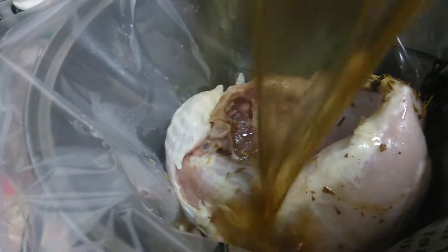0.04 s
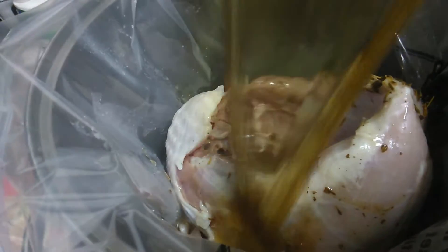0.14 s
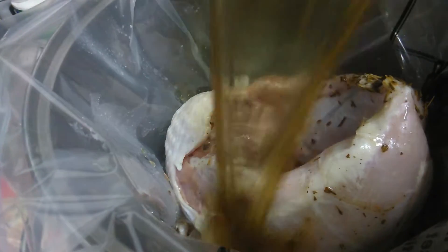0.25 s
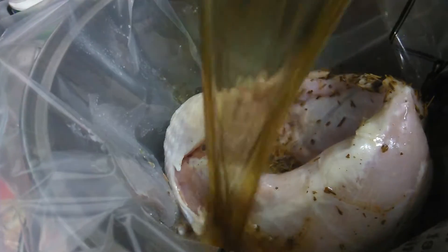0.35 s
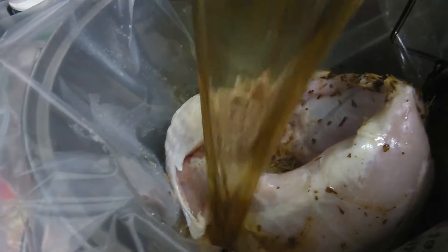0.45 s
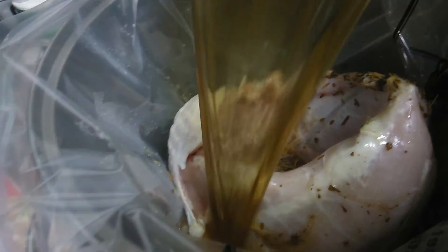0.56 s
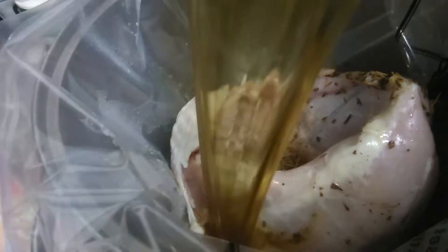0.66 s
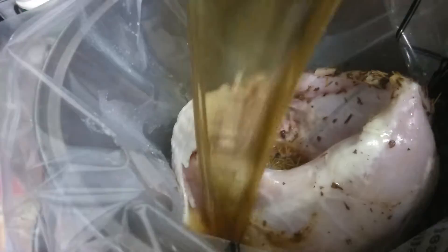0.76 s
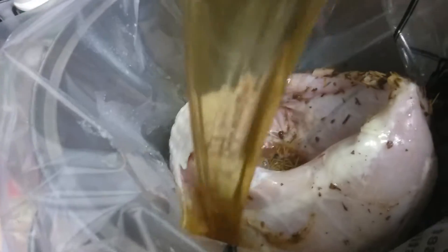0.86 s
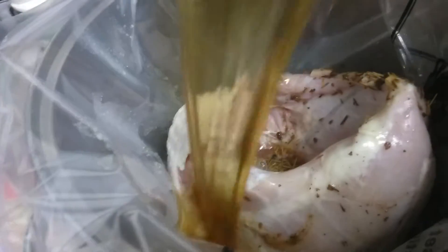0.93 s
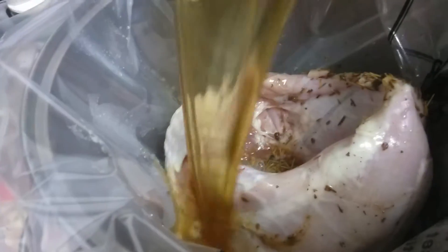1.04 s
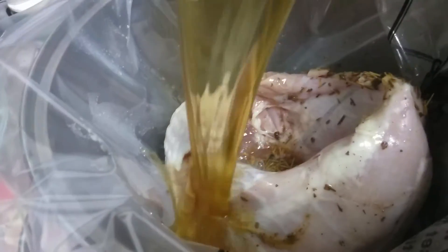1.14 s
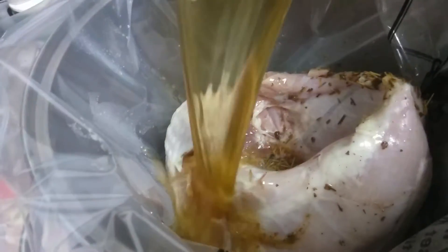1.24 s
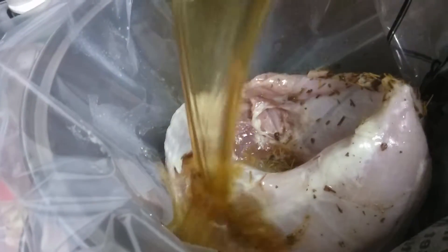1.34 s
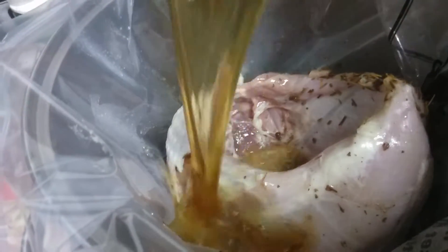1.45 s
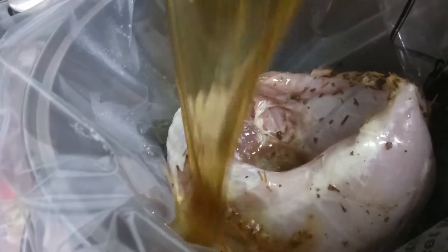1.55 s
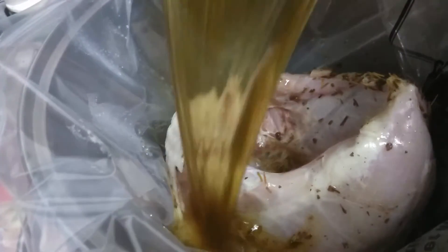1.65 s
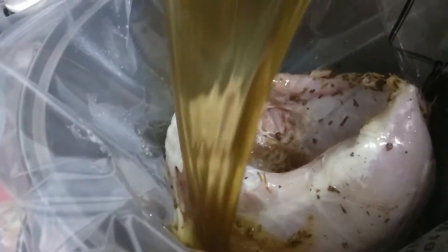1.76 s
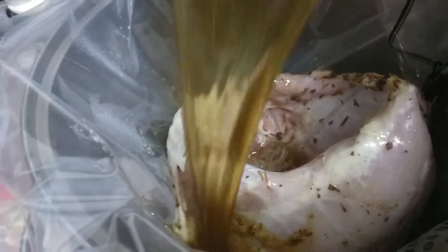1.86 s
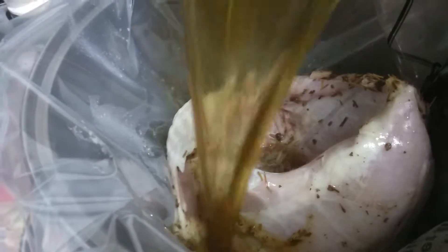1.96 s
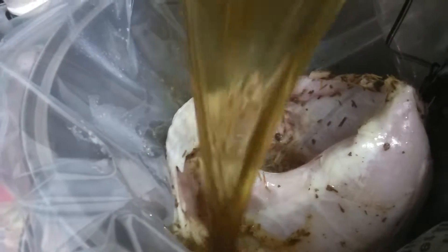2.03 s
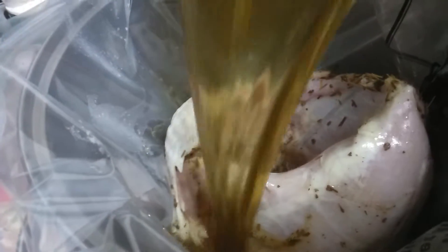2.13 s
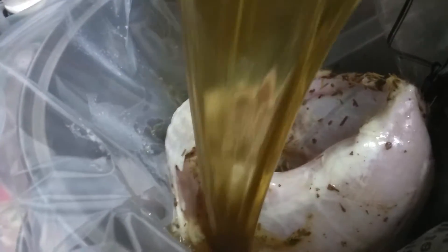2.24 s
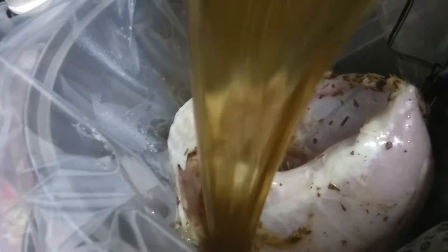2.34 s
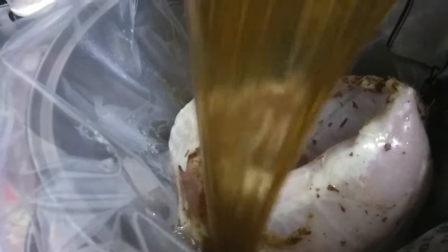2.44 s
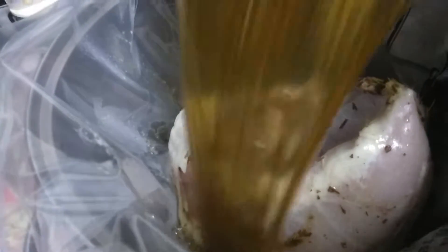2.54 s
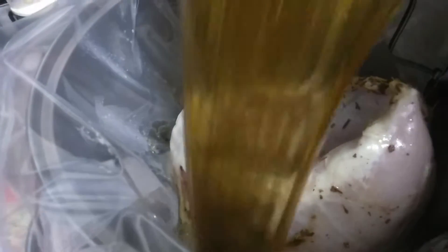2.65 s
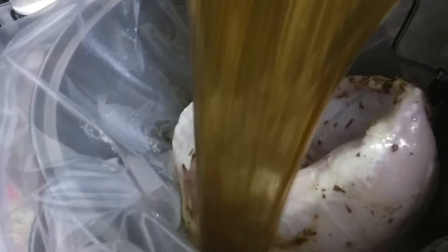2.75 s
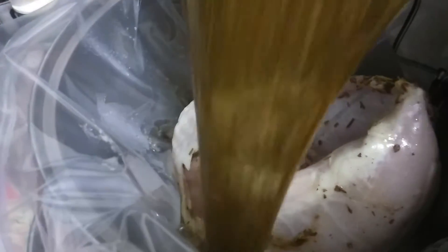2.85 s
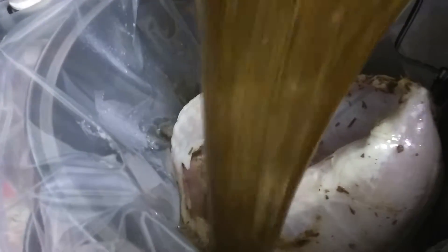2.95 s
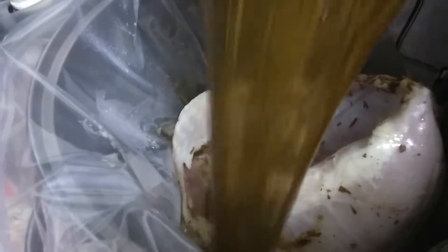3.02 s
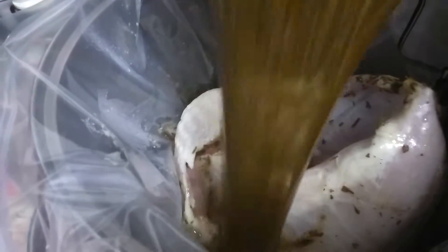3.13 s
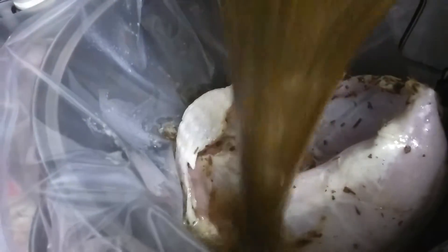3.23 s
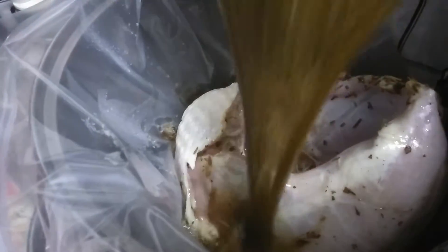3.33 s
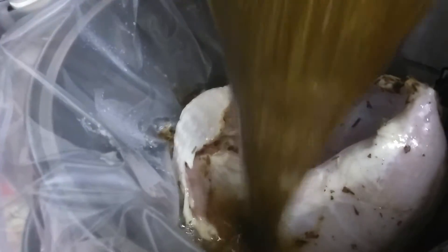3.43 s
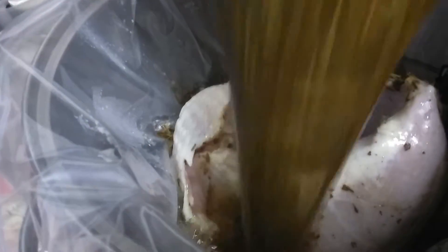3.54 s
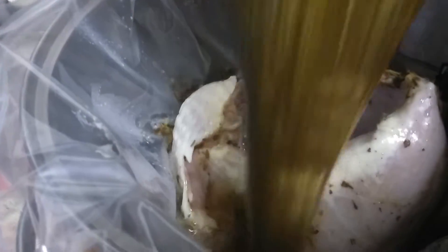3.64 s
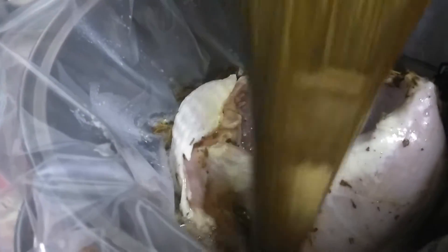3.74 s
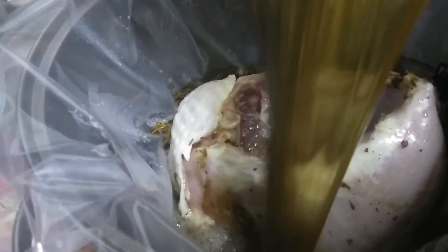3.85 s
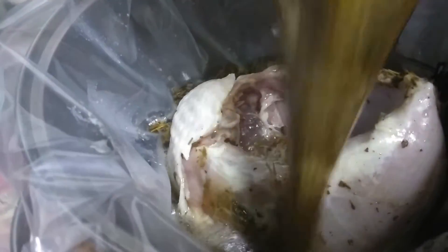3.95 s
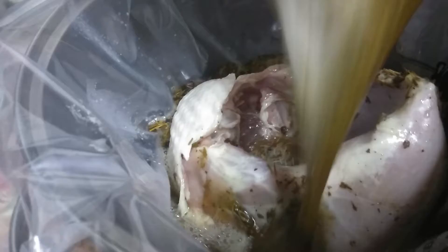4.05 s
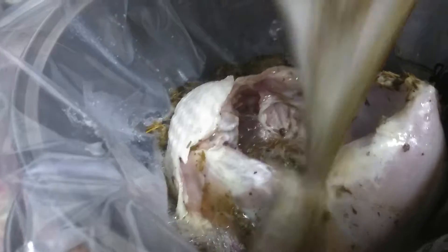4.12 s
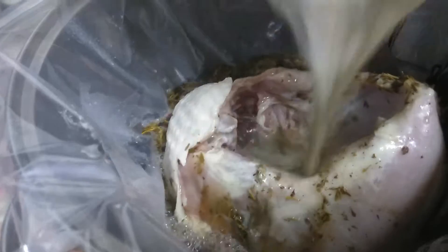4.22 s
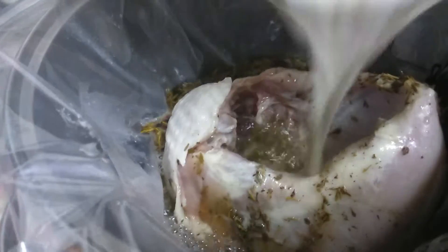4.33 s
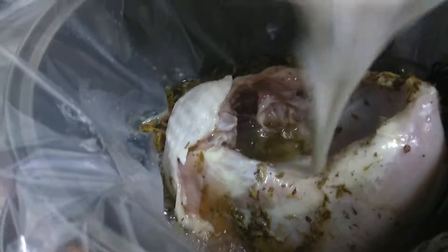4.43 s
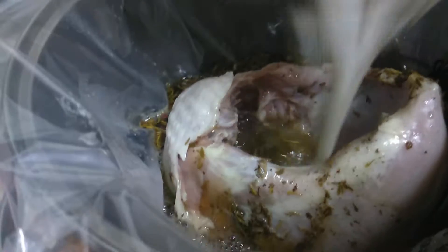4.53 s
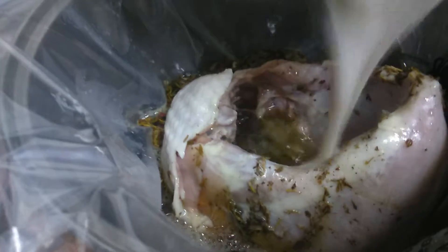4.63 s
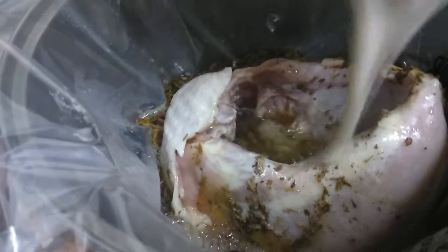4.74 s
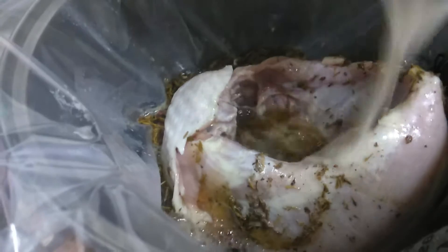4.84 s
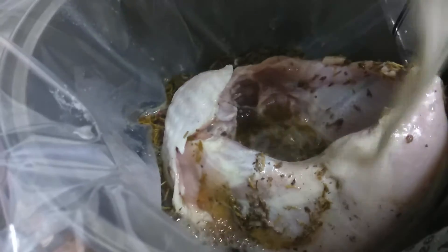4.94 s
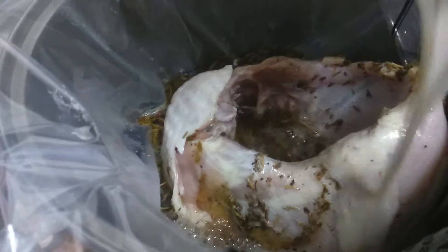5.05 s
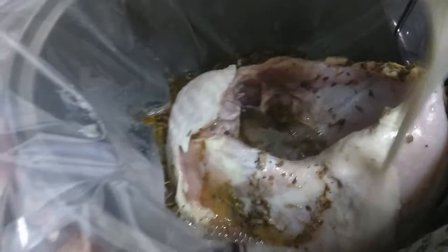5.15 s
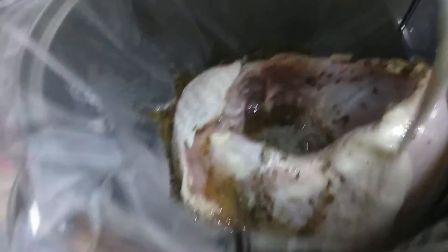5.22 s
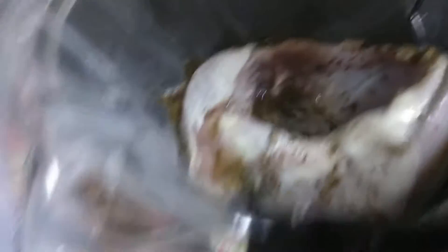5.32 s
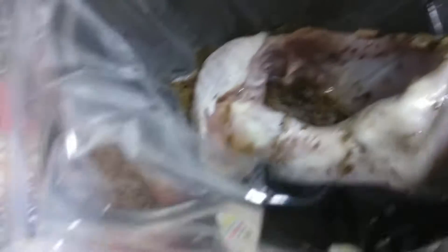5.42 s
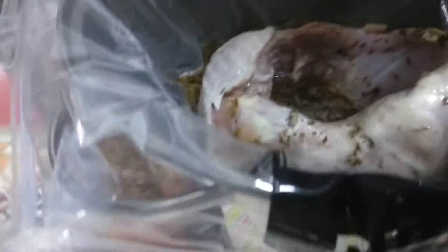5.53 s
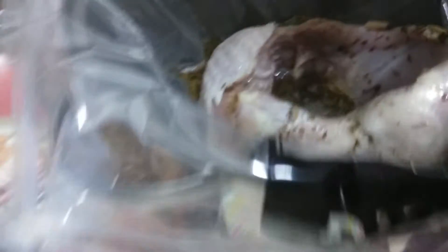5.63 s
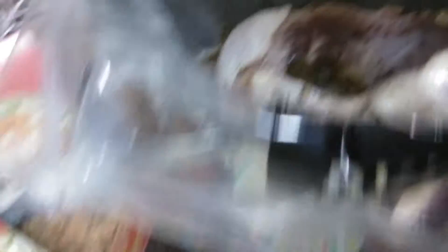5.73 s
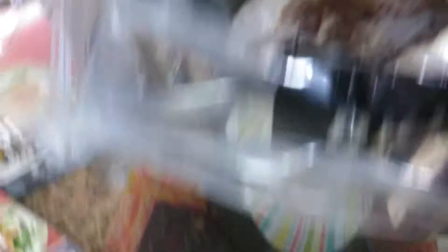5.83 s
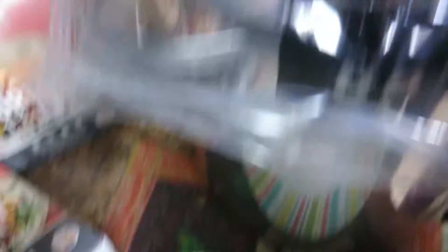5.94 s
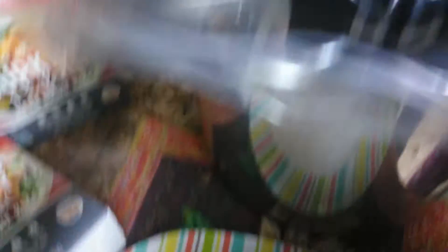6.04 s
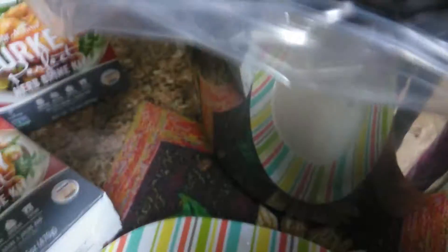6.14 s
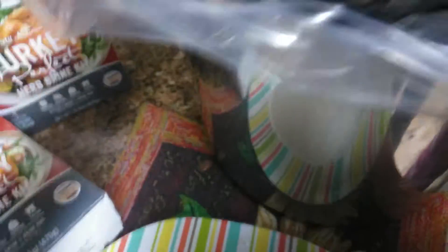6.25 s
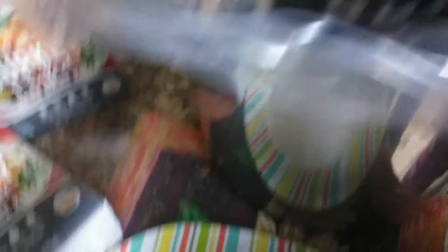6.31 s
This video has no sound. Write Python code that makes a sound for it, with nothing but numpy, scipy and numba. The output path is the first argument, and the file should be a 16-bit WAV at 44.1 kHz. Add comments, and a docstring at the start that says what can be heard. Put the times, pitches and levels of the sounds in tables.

```python
"""Brine poured over a bagged bird

Brine pours in a wide sheet onto a raw bird in a plastic bag inside a deep pot, just under a hand-held phone.
Bubbles gurgle and spatter as clouds of short rising sine grains; slugs of liquid slap as tight grain bursts.
As the pour thins, foam fizzes, the bag ticks, soft hiss swells and a thin whine of steady sines shows through.
The two microphone ports are wired in opposite sense and the right one is shaded."""
import sys
import numpy as np
from scipy import signal
from scipy.fft import rfft, irfft
from scipy.io import wavfile
from scipy.ndimage import map_coordinates
from numba import njit

SR = 44100
rng = np.random.default_rng(int(sys.argv[2]) if len(sys.argv) > 2 else 0)


def waveform_to_disk(signal):
    """Save audio, clipped to [-1, 1], as 16-bit WAV at the path in sys.argv[1]."""
    frames = np.transpose(np.atleast_2d(signal))
    scaled = np.clip(frames, -1, 1) * 32767
    samples = np.round(scaled).astype(np.int16)
    wavfile.write(sys.argv[1], SR, samples)


N = 281358  # length in samples

# The pour: (time [s], bubbling control level [dB], spray and foam control level [dB])
POUR = [(0, -31.5, -33.5), (.15, -33.5, -34.5), (.42, -29.5, -31.5), (.68, -33, -34.5), (.9, -29.5, -31),
        (1.0, -32.5, -31.5), (1.22, -31, -34.5), (1.3, -30, -31), (1.44, -31.5, -32.5), (1.6, -33, -36),
        (1.78, -28.5, -33.5), (2.0, -36, -38), (2.15, -34, -39.5), (2.33, -33.5, -35), (2.42, -29.5, -33),
        (2.56, -35, -43), (2.66, -35.5, -41), (2.76, -29.5, -31.5), (2.82, -29, -35), (2.91, -40.5, -45.5),
        (3.0, -35, -42.5), (3.07, -34, -36), (3.22, -35.5, -36), (3.34, -33, -34.5), (3.46, -29.5, -35.5),
        (3.53, -37, -41.5), (3.66, -33, -35.5), (3.76, -31.5, -37), (3.86, -36, -37.5), (3.94, -35, -36.5),
        (4.0, -37, -38.5), (4.07, -35, -36), (4.12, -42.5, -43.5), (4.17, -35, -36), (4.28, -38.5, -49.5),
        (4.32, -51.5, -40), (4.35, -37.5, -34), (4.39, -45, -47.5), (4.55, -52, -45.5), (4.67, -43.5, -46),
        (4.76, -54.5, -48.5), (4.81, -58, -50), (4.86, -48.5, -49), (5.05, -60.5, -52), (5.3, -67, -52),
        (5.65, -71.5, -53.5), (5.76, -70, -51.5), (6.15, -72, -54), (6.19, -85.5, -63), (6.38, -78, -65)]
# The thinning stream breaks up more: (time [s], depth of the tearing [exponent])
TEAR = [(0, 0.57), (2.2, 1.07), (4.05, 2.5), (4.3, 2.6), (4.7, 1.7), (4.9, 0.91), (6.38, 0.91)]
# Now larger, now smaller bubbles: (time [s], glug over splash [dB])
DEPTH = [(0, 6), (.25, 0), (.5, 3.5), (.68, 4.5), (.9, -1.5), (1.3, 1.5), (1.8, 1), (2.5, 2.5), (3.0, 0.5),
         (3.6, 0), (4.05, -3.5), (4.28, 4.5), (4.6, -7.5), (4.85, 1.5), (6.38, -6.5)]
# The bubble size the stream favours: (time [s], glug pitch [Hz], splash pitch [Hz])
FAVOUR = [(0, 1150, 2070), (.2, 960, 2580), (.45, 910, 2500), (.65, 1100, 2380), (.85, 1100, 2830),
          (1.0, 1000, 2900), (1.25, 996, 2490), (1.8, 1190, 2330), (2.7, 1030, 2300), (3.6, 1150, 2080),
          (3.75, 825, 2210), (4.1, 1180, 2310), (4.85, 1040, 2370), (5.1, 1070, 1930), (6.38, 1240, 1920)]
# Heavy lumps plunging into the pool, each a swell of low gurgle: (time [s], level [dB])
PLUNGES = [(.0, -42.5), (.46, -51), (.96, -45.5), (1.37, -50), (1.51, -43.5), (1.69, -41), (2.1, -50),
           (2.4, -40.5), (2.49, -53), (2.74, -43.5), (3.0, -38.5), (3.46, -44), (3.62, -44.5),
           (3.75, -37.5), (4.2, -52), (4.35, -50.5), (5.36, -82), (5.52, -59.5), (5.825, -54),
           (5.91, -60.5), (6.14, -57.5)]
# The hand shifting on the phone, each a swell of rumble: (time [s], level before lulls [dB])
BUMPS = [(.06, -50), (.28, -55), (.43, -56), (.73, -60), (1.22, -59), (1.45, -57.5), (1.68, -56),
         (2.4, -65), (2.55, -64), (2.72, -62), (2.81, -56), (3.53, -62), (3.77, -59), (4.39, -60),
         (4.76, -65), (5.05, -70), (5.33, -62.5), (5.6, -65), (5.85, -67), (6.03, -73), (6.14, -84)]
# Dips in the rumble: (time [s], half length [s])
LULLS = [(.18, 0.045), (1.9, 0.12), (2.26, 0.11), (3.25, .12), (4.0, .12), (4.6, .08)]
# Steady whine tones: (pitch [Hz], level before fade and panning [dB])
WHINES = [(1921, -68), (1320, -79)]
# Level ride of the whine: (time [s], gain [dB])
WHINE_FADE = [(0, 0), (5.0, 8), (5.5, 1), (6.14, 4.5), (6.22, -4.5), (6.38, -12)]
# Single large bubbles popping in the pool: (time [s], level before trim [dB], pitch [Hz], left minus right [dB])
POPS = [(0.02, -15.5, 1470, 4), (0.229, -16, 2950, 8.5), (0.341, -21, 853, 11), (0.388, -17, 1250, 9),
        (0.405, -19, 2900, 9), (0.421, -21, 2850, 8), (0.43, -26, 890, 8), (0.449, -22, 920, 9),
        (0.463, -20, 890, 9), (0.48, -21.5, 880, 12), (0.514, -26, 1010, 8), (0.535, -17, 2880, 9),
        (0.6, -25, 1030, 8), (0.625, -21, 970, 10), (0.645, -21.5, 952, 11), (0.665, -22, 920, 10),
        (0.505, -16, 1800, 4), (0.724, -23, 1430, 2), (0.813, -16, 1140, 11.5), (0.851, -16, 2800, 10),
        (0.868, -20, 2850, 11), (0.882, -16, 2730, 15), (0.895, -17, 2980, 11), (0.939, -20, 2620, 8),
        (0.958, -14.5, 2920, 14), (0.965, -13, 2820, 10), (0.98, -24, 2830, 12), (1.01, -24.5, 910, 13),
        (1.294, -15, 2940, 13), (2.208, -22, 1520, 8), (2.247, -21, 3000, 5), (2.326, -18, 2120, 7.5),
        (2.487, -20, 757, 8.5), (2.626, -17, 2120, 13), (2.627, -22, 870, 13), (2.68, -22.5, 1350, 9),
        (2.83, -22, 1480, 8), (3.141, -26, 2320, 9.0), (3.182, -30, 2130, 8.5), (3.302, -15.5, 2240, 12),
        (3.352, -21, 2150, 14), (3.385, -14.5, 2090, 10), (3.42, -16, 2700, 7), (3.459, -21, 2260, 16),
        (3.918, -22, 2380, 10), (4.063, -15, 2730, 12), (4.182, -18, 2170, 10), (4.182, -19, 1480, 9),
        (4.254, -25, 1900, 11), (4.225, -39, 2700, 6), (4.242, -22, 877, 4), (4.274, -23, 875, 6),
        (4.337, -28, 1360, 11), (4.554, -39.5, 970, 11), (4.744, -31, 2820, 13), (4.347, -35, 1350, 9),
        (4.874, -41, 1080, 9.5), (4.495, -24, 4460, 6), (4.488, -26, 2300, 11)]
# Slugs of liquid hitting bag and pool; levels before trims: (time [s], level [dB], centre [Hz],
# body against level [dB], left minus right [dB], width [octaves], burst spread [ms])
SLAPS = [(0.0558, -14.5, 12800, -24, 19, 0.64, 0.95), (0.0782, -13, 3810, -21, 10, 0.67, 1.15),
         (0.122, -15.5, 11100, -14, 15, 0.54, 1.4), (0.171, -14, 8260, -19, 19, 0.11, 1.46),
         (0.1945, -16, 7700, -16, 16, 0.27, 1.7), (0.2024, -17, 10500, -16, 21, 0.19, 2.5),
         (0.2668, -0.5, 10370, -9, 10.5, 0.57, 0.97), (0.3955, -17, 8100, -5, 13, 0.23, 1.3),
         (0.413, -14, 11000, -19, 10, 1, 0.95), (0.4274, -11, 9800, -23, 22, 0.1, 0.83),
         (0.5033, -14, 11000, -18, 15, 0.18, 1.3), (0.5257, -16, 10250, -16, 16, 0.55, 1.4),
         (0.5364, -11, 10200, -16, 16, 0.56, 0.44), (0.6883, -17, 10800, -4, 13, 0.2, 0.75),
         (0.7113, -14.5, 10400, -14, 20, 0.38, 1.1), (0.7632, -10.5, 3880, -18, 6, 0.13, 1.6),
         (0.8415, -14.5, 4300, -17, 13, 0.27, 2.9), (0.9378, -14, 10400, 4, 18, 0.92, 1.8),
         (1.017, -24, 10160, -19, 15, 0.22, 0.98), (1.0715, -13.5, 11500, -8, 18, 0.65, 1.6),
         (1.116, -22, 4610, -8, 7, 0.64, 0.66), (1.1752, -18, 6360, -17, 18, 0.31, 2.6),
         (1.192, -19, 8400, -15, 14, 0.47, 2.9), (1.3019, -15, 11000, -16, 18, 0.53, 1.3),
         (1.4435, -12, 11580, -20, 16, 0.097, 0.81), (1.5953, -29, 10900, -14, 7, 0.6, 2.8),
         (1.6367, -14.5, 11500, -18, 14, 0.34, 1.5), (1.6776, -6, 6200, 0, 6, 0.78, 1),
         (1.697, -6.5, 4010, -19, 8, 0.5, 0.86), (1.8058, -11, 4720, -17, 3, 0.72, 1.55),
         (1.895, -13.5, 3260, -16, 8.5, 0.75, 3.04), (2.0023, -16.5, 3380, -14, 3, 0.14, 3),
         (2.0582, -24, 4100, -18, 10, 0.55, 1.8), (2.0837, -14, 5900, -23, 11, 0.24, 0.8),
         (2.136, -20, 8440, -9, 7, 0.11, 0.7), (2.156, -21, 8400, -13, 7, 0.35, 1.5),
         (2.163, -16, 8580, -20, 10, 0.31, 3), (2.169, -23, 5700, -17, 5, 0.47, 2.3),
         (2.2084, -14, 4430, -19, 11, 0.4, 1.07), (2.2558, -15, 3970, -3, 8, 0.22, 3.1),
         (2.2757, -15.5, 10250, -18, 18, 0.33, 1.5), (2.3855, -3, 11140, -11, 9, 0.31, 1.7),
         (2.5726, -33, 9500, -8, 8, 0.35, 1.5), (2.594, -26, 4700, 3, 6, 0.71, 3.1),
         (2.6135, -19.5, 11500, -19, 22, 0.35, 0.7), (2.6843, -24, 9470, -11, 9, 0.25, 1.6),
         (2.7107, -2.5, 10370, -11.5, 15, 0.49, 1.36), (2.7385, -1, 12000, -18, 15, 0.57, 0.86),
         (2.7688, -16, 9900, -16, 12, 0.49, 2.1), (2.784, -12, 9500, -14, 14, 0.63, 2.5),
         (2.812, -6, 9930, -11, 14, 0.71, 0.92), (2.8848, -25, 8850, -8, 14, 0.47, 3.5),
         (2.9397, -21, 10400, -22, 22, 0.19, 0.62), (2.9697, -18.5, 7070, -14, 10, 0.25, 2.2),
         (2.9961, -13.5, 4470, -2.5, 13, 0.81, 0.82), (3.0096, -16.5, 6970, 1, 12, 0.67, 2.16),
         (3.032, -24, 4200, 1, 16, 1, 2.5), (3.0654, -17, 9060, -17, 19.5, 0.33, 2.1),
         (3.1058, -14, 8960, -15, 18, 0.13, 0.75), (3.1248, -2.5, 4660, -26, 16.5, 0.17, 0.48),
         (3.1445, -10.5, 9600, -17, 19, 0.35, 0.59), (3.1612, -13, 6870, -22, 11, 0.098, 2),
         (3.25, -17.5, 11140, -18, 18, 0.36, 2.3), (3.2755, -15, 11200, -22, 16, 0.12, 0.86),
         (3.303, -22, 6600, -9, 1, 0.23, 1.9), (3.3423, -13, 4280, -13, 7, 0.37, 2.25),
         (3.4305, -12.5, 6760, -18, 11, 0.38, 2.7), (3.6055, -12.5, 7700, -23, 17, 0.23, 1.8),
         (3.7405, -9.5, 9750, -2.5, 15.5, 0.66, 1.07), (3.8217, -22, 8800, -16, 12, 0.34, 3.4),
         (3.8342, -7, 10750, -28, 20.5, 0.18, 0.84), (3.8786, -25, 9950, -11, 14, 0.13, 2.4),
         (3.917, -16, 8870, -16, 13, 0.36, 2.04), (4.0751, -12, 11700, -24, 21.5, 0.098, 0.5),
         (4.132, -18, 11330, -9, 17, 0.14, 1.1), (4.1465, -18, 11200, -19, 16, 0.25, 1.1),
         (4.192, -10.5, 4100, -0.5, 10, 0.22, 0.91), (4.2762, -27, 11000, -3, 12, 0.63, 2.6),
         (4.3025, -26, 11630, -8, 16, 0.15, 1.8), (4.311, -17, 12300, -25, 13, 0.33, 1.4),
         (4.317, -14.5, 11200, -26, 14, 0.1, 0.95), (4.3251, -17, 11600, -26, 12, 0.19, 0.7),
         (4.3375, -14, 11650, -12, 7, 0.55, 1.55), (4.347, -25, 5240, -21, 15, 0.71, 0.68),
         (4.36, -19, 12130, -20, 9, 1, 2.1), (4.367, -22, 11300, -26, 10, 0.32, 1.8),
         (4.3899, -15.5, 10420, -28, 18, 0.18, 0.32), (4.4064, -15, 4560, -26, 7, 0.59, 1.9),
         (4.4283, -21, 11260, -15, 9, 0.67, 2.2), (4.4438, -24, 11060, -19, 12, 1, 1.9),
         (4.4732, -1, 8300, -26, 8, 0.21, 1.38), (4.4945, -13.5, 11030, -15, 11, 0.31, 2.4),
         (4.5456, -32, 11100, -23, 6, 0.57, 1.7), (4.555, -28, 5060, -23, -2, 0.29, 2.3),
         (4.5875, -19.5, 6400, -13, 0, 0.24, 1.5), (4.6433, -10, 7870, -9.5, 9, 0.38, 1.04),
         (4.7546, -22.5, 5640, -21, 6, 0.4, 1.2), (4.765, -25, 5600, -26, 6, 0.4, 0.8),
         (4.8205, -13, 4200, -27, 10, 0.46, 1.43), (4.8256, -5, 5020, -46, 5.5, 0.3, 0.89)]
# The heaviest slugs, levels before trims: (time [s], smack level [dB], thump level [dB])
SMACKS = [(0.267, -13, -47), (0.764, -26, -57.5), (0.939, -20, -55), (1.678, -15.5, -45), (2.3863, -9, -41),
          (2.7103, -9, -41), (2.739, -12.5, -52), (2.812, -17, -54), (2.996, -18, -50), (3.125, -25, -56),
          (3.741, -15, -48), (4.191, -18, -56), (4.406, -27, -61), (4.644, -26, -62)]
# The bag ticking as it settles, levels before trims:
# (time [s], level [dB], centre [Hz], body against level [dB], left minus right [dB])
TICKS = [(4.820, -37.5, 2020, 15, 11), (4.8905, -35, 1910, 6, 18), (4.8968, -33, 1950, 2, 12),
         (4.9222, -36, 1940, -14, 15), (4.974, -45, 1930, -16, 14), (5.005, -42, 1940, -14, 16),
         (5.0247, -38, 1940, -16, 21), (5.0515, -36, 2060, -17, 21), (5.0803, -34.5, 1950, -13, 19),
         (5.108, -37, 1910, -12, 18), (5.1332, -36, 1950, -18, 17), (5.221, -47, 1850, 1, 21),
         (5.256, -57, 1900, 6, 21), (5.291, -59, 1900, 4, 25), (5.3213, -46, 1860, -6, 23),
         (5.346, -44.5, 1920, 1, 25), (5.3722, -40.5, 2010, -8, 27), (5.467, -40, 1960, -22, 22),
         (5.4906, -51, 1910, -9, 22), (5.5088, -40, 1810, -3, 17), (5.5543, -44, 1810, -4, 22),
         (5.927, -45, 1910, -15, 24), (5.9593, -48, 1930, -8, 21), (6.039, -60, 1930, -13, 20)]
# Swells of soft narrow hiss at 2 to 3 kHz in the fading tail: (time [s], level [dB])
HISS_SWELLS = [(4.95, -59), (5.07, -64), (5.2, -64), (5.33, -68), (5.5, -76), (5.84, -65), (5.95, -72),
               (6.1, -75), (6.2, -79)]
# Dry snaps, levels before trims: (time [s], level [dB], centre [Hz], body against level [dB])
SNAPS = [(5.066, -35, 9000, -24), (5.203, -37, 7450, -18), (5.421, -43, 7500, -27), (5.733, -41, 9800, -30),
         (5.7573, -31.5, 11100, -13), (6.0345, -33, 12100, -42)]
# Rounder knocks on the pot that ring on: (time [s], level before trim [dB], pitch [Hz], ring [cycles])
KNOCKS = [(5.758, -44, 1800, 62), (5.759, -46, 2640, 48), (6.090, -40, 1560, 55), (6.092, -56, 2450, 50),
          (6.107, -44, 1580, 62), (6.138, -32, 1790, 51), (6.141, -44, 2430, 40), (6.152, -46, 1660, 77)]
# Colour of pot and microphone: (frequency [Hz], relative level [dB])
COLOUR = [(24, -42), (40, -23), (237, -14), (312, -5), (382, -8.5), (715, -1), (873, -0.5), (1040, -5.5),
          (2840, 7.5), (3380, 3.5), (4240, -1), (5580, -2), (11300, -6), (12500, -13), (16000, -30.5)]
# Air modes of the pot: (frequency [Hz], width [Hz], boost [dB])
POT_MODES = [(320.3, 56, 7.5), (733, 120, -3.5), (870, 82, 3), (3160, 240, -1), (2600, 1240, -11.5),
             (4340, 510, 3.5), (12200, 1700, 2)]
# Shading of the right port: (frequency [Hz], left minus right [dB])
SHADE = [(60, 0.6), (110, 3.5), (200, 7.5), (380, 5), (700, 8.5), (1290, 11), (2380, 10.5), (4400, 4),
         (8120, 13), (15000, 32)]
# Bands notched out as the pour fades: (frequency [Hz], width [Hz])
NOTCHES = [(640, 210), (1500, 200), (2600, 670), (3150, 820)]

# Grain clouds, each one row: (lowest pitch [Hz], highest pitch [Hz], density [grains/s], typical length [cycles],
# upward glide [octaves], size spread [dB], patchiness [dB])
GURGLE = (127, 619, 1200, 11.4, 0.058, 0.9, 2.2)
GLUG = (650, 1557, 2000, 19.4, 0.045, 1.75, 2.46)
SPLASH = (1405, 3230, 2500, 18, 0.43, 1.67, 1.94)
SPATTER = (3376, 7230, 3500, 41, 0.089, 1.84, 1.9)
FIZZ = (6450, 18160, 15000, 11, 0.12, 1.3, 3.1)
RUMBLE = (31, 189, 350, 1.6, 0.066, 1.2, 3)
TAIL_HISS = (2080, 2870, 680, 36, 0.055, 1.7, 2.5)

# Levels when the bubbling column reads STREAM_REF_DB, before drift; slopes in dB per dB
STREAM_REF_DB = -34
GURGLE_DB, GURGLE_SLOPE, GLUG_DB, GLUG_SLOPE = -51.5, 0.61, -39, 0.98
SPLASH_DB, SPLASH_SLOPE, RUMBLE_DB, RUMBLE_SLOPE = -36, 1.07, -77.5, 0.6
SPATTER_DB, FOAM_SPATTER_DB = -2, -8.5  # against the spray; the second fades in as only foam is left
# The gurgle is strong near one pitch at first and fades there to a dip
EARLY_S, EARLY_HZ, EARLY_DB, LATE_DB = 4.2, 605, 6.5, -13.5
PLUNGE_S, BUMP_S, HISS_SWELL_S = 0.014, 0.054, 0.031  # swell widths
FOAM_PAN_DB, WANDER_PER_S = 8.5, 22
CLUSTER_SHARE = 0.83  # slow patches against quick ones
PORT_LAG_S, PLACE_SPREAD_S, PHASE_SPREAD = 0.00012, 0.00013, 0.52  # phase in radians
BASS_SCATTER_HZ = 60.5  # the ports' phases scatter more towards this pitch and below
SHRILL_HZ, LEAD_S = 13000, .00005  # pitch where drops fold back down; a hit starts just before its marked time
PAN_DB_PER_OCTAVE = 6  # the shaded port loses the higher drops of a burst
# DROP_DB is the level before trims when the spray column reads DROP_SPRAY_DB
DROPS_PER_S, DROP_DB, DROP_SPREAD_DB, DROP_SPRAY_DB = 26, -35.5, -1, -39
DROP_LO_HZ, DROP_HI_HZ = 3350, 11900
RING_LENGTHS = 4.83  # slap grains ring longer by this many burst spreads
POP_CYCLES, POP_GLIDE, POP_DB = 23, 0.086, -2  # glide in octaves; level trim
SMACK_HZ, SMACK_OCTAVES, SMACK_DB, SMACK_S, SMACK_CYCLES = 2710, .9, -15, .0006, 8
THUMP_HZ, THUMP_DB = 150, -2.5
SNAP_PAN_DB, KNOCK_PAN_DB, KNOCK_DB = 20, 10, -10
CLIP, TOP_HZ = .88, 15800  # sample value; top of the phone's range


def undb(db):
    """Decibels to gain."""
    return 10 ** (np.asarray(db) / 20)


def curve(column, table=POUR):
    """Automation lane: one column of a table, sample by sample."""
    table = np.array(table)
    return np.interp(np.arange(N) / SR, table[:, 0], table[:, column])


def unit(x):
    """Scales a stereo sound so that its middle has rms 1."""
    return x / np.sqrt(np.mean(x.mean(axis=0) ** 2))


def on_log(table, hz):
    """Reads a spectrum on a log-frequency axis."""
    table = np.array(table)
    return np.interp(np.log(hz), np.log(table[:, 0]), table[:, 1])


def highpass(x, order, hz):
    """Butterworth low cut."""
    return signal.sosfilt(signal.butter(order, hz, "high", fs=SR, output="sos"), x)


def swells(table, width_s):
    """Gain that rises and falls round each (time, level) row."""
    t = np.arange(N) / SR
    return np.sqrt(sum(undb(2 * db) * np.exp(-((t - s) / width_s) ** 2) for s, db in table))


def wander(spread_db):
    """A level that drifts at random."""
    steps = rng.standard_normal(int(WANDER_PER_S * N / SR) + 2)
    return undb(spread_db * np.interp(np.linspace(0, len(steps) - 1, N), np.arange(len(steps)), steps))


@njit
def ring(start, hz, cycles, glide, left, right, out):
    """Adds decaying, rising sine grains that open over about a cycle; left and right are complex sizes."""
    sound = out.copy()
    for k in range(len(start)):
        length = int(cycles[k] * SR / hz[k]) + 2
        step = np.exp(2j * np.pi * hz[k] / SR - 5. / length)  # turn and decay of one sample
        rise = np.exp(2j * np.pi * hz[k] / SR * glide[k] * np.log(2) / length)
        z, hush, open_up = 1. + 0j, 1., np.exp(-1.5 * hz[k] / SR)
        for i in range(start[k], min(start[k] + length, sound.shape[1])):
            hush *= open_up
            sound[0, i] += (z * left[k]).imag * (1 - hush)
            sound[1, i] += (z * right[k]).imag * (1 - hush)
            z *= step
            step *= rise
    return sound


def grains(s, hz, cycles, glide, size, pan_db, chance):
    """Each grain bursts at its own place, so its phase between the opposed ports varies with pitch and chance."""
    lag_s = PORT_LAG_S + PLACE_SPREAD_S * chance[0]
    scatter = PHASE_SPREAD * (1 + BASS_SCATTER_HZ / hz * 2) * chance[1]
    turn = np.pi + 2 * np.pi * hz * lag_s + scatter  # pi: ports wired in opposite sense
    one = np.ones(len(s))
    left = size * undb(pan_db / 2) + 0j
    right = size * undb(-pan_db / 2) * np.exp(1j * turn)
    return ring((s * SR).astype(np.int64), hz, cycles * one, glide * one, left, right, np.zeros((2, N)))


def pot(x, lo_hz, hi_hz):
    """Air modes and ports colour both channels, with a steep roll-off outside the band."""
    hz = np.maximum(np.fft.rfftfreq(N, 1 / SR), 1.)
    modes = sum(gain / (1 + (2 * (hz - f) / width) ** 2) for f, width, gain in POT_MODES)
    edges = 10 * np.log10((1 + (lo_hz / hz) ** 24) * (1 + (hz / hi_hz) ** 24))
    db = on_log(COLOUR, hz) + modes - edges
    shade = on_log(SHADE, hz) / 2
    return irfft(rfft(x) * undb(np.array([db + shade, db - shade])), N)


def patchwork(per_s, bands, when, place):
    """Smooth random level over time and pitch, read at each grain."""
    grid = rng.standard_normal((int(per_s * N / SR), bands))
    return map_coordinates(grid, [when * (len(grid) - 1), place * (bands - 1)], order=1)


def cloud(lo_hz, hi_hz, rate, cycles, glide, spread_db, patch_db, favour_hz=None, favour_db=None):
    """Random grains between two pitches, in patches of like size; rms 1."""
    count = int(rate * N / SR)
    when, place = rng.random((count, 2)).T
    hz = lo_hz * (hi_hz / lo_hz) ** place
    # high grains are brief: sizing by pitch keeps the sum flat
    size = hz * undb(spread_db * np.minimum(rng.exponential(1., count), 4.))
    db = patch_db * patchwork(75, 12, when, place)
    db = db + CLUSTER_SHARE * patch_db * patchwork(14, 6, when, place)
    if favour_hz is not None:
        now = (when * N).astype(int)
        db = db + favour_db[now] * np.exp(-(np.log2(hz / favour_hz[now]) / 0.21) ** 2)
    chance = rng.standard_normal((count, 3)).T
    lengths = cycles * np.exp(0.58 * chance[2])
    sound = grains(when * N / SR, hz, lengths, glide, size * undb(db), 0., chance)
    return unit(pot(sound, lo_hz, hi_hz))


def swarm(s, db, hz, pan, octaves, spread_s, cycles, count):
    """A tight burst of grains round a centre pitch at each time, the late ones softer."""
    columns = [v + 0 * s for v in (s, db, hz, pan, octaves, spread_s, cycles)]
    s, db, hz, pan, octaves, spread_s, cycles = np.repeat(columns, count, axis=1)
    chance = rng.standard_normal((len(s), 5)).T
    late = np.abs(chance[4]) ** 1.5
    pitch = hz * 2 ** (octaves * chance[2])
    # the smallest drops cannot ring higher
    pitch = np.where(pitch > SHRILL_HZ, SHRILL_HZ ** 2 / pitch, pitch)
    # low grains last longer, so start softer
    size = undb(db + 0.72 * chance[3] - 0.93 * late) * (pitch / hz) ** .4
    pan = pan + PAN_DB_PER_OCTAVE * np.log2(pitch / hz)
    return grains(s - LEAD_S + spread_s * late, pitch, cycles, 0.13, size, pan, chance)


def hits(table, pan, octaves, spray_octaves, spread_s, cycles,
         crack_db, spray_db, body_hz, body_db, thud_hz, thud_db):
    """Each hit layers a crack, trailing spray, a body and a low thud, all as grain bursts."""
    s, db, hz, mid_db = np.transpose(table)[:4]
    pan = pan + 0 * s
    crack = swarm(s, db + crack_db, hz, pan, octaves, spread_s, cycles, count=40)
    spray = swarm(s, db + spray_db, hz, pan, spray_octaves, 5.2 * spread_s, cycles, count=50)
    body = swarm(s, db + mid_db + body_db, body_hz, 0.58 * pan, 0.68 * spray_octaves,
                 3.2 * spread_s, 12.6, count=8)
    thud = swarm(s, db + thud_db, thud_hz, 0 * pan, 0.53, spread_s, 2.1, count=2)
    return highpass(crack + spray + body, 4, 300.) + thud


def surge(rate, fade_s, spread_db):
    """The sheet tears and gathers: sudden swells that die away."""
    kicks = (rng.random(N) < rate / SR) * rng.random(N)
    fading = signal.lfilter([1], [1, -np.exp(-1 / (fade_s * SR))], kicks)
    return undb(spread_db * np.minimum(fading, 0.9))


def stillness():
    """From 0 in full pour to 1 in the last trickle."""
    return np.clip((-43.0 - curve(1)) / 20.7, 0, 1)


def pour():
    """Five bubble clouds from low gurgle to fizz, ridden by the pour and torn with the sheet."""
    stream_db, spray_db, depth_db = curve(1) - STREAM_REF_DB, curve(2), curve(1, DEPTH)
    flow = np.clip((spray_db + 56.0) / 6.4, 0, 1)  # foam alone fizzes evenly; only the stream tears
    torn = surge(90., 0.0033, 3.7) ** (flow * curve(1, TEAR))
    still = stillness()  # the last trickle makes bubbles closer to one size
    early = np.clip(1 - np.arange(N) / SR / EARLY_S, 0, 1)

    stream_gurgle = undb(GURGLE_DB + GURGLE_SLOPE * stream_db) * wander(4.4)
    gurgle_gain = np.hypot(stream_gurgle, swells(PLUNGES, PLUNGE_S))
    glug_gain = undb(GLUG_DB + depth_db / 2 + GLUG_SLOPE * stream_db) * wander(1.9) * torn ** 0.62
    splash_gain = undb(SPLASH_DB - depth_db / 2 + SPLASH_SLOPE * stream_db) * wander(1.04) * torn ** 0.49
    spatter_db = spray_db + SPATTER_DB + FOAM_SPATTER_DB * (1 - flow)
    spatter_gain = undb(spatter_db) * wander(1.56) * torn ** 0.49
    fizz_gain = undb(spray_db) * wander(1.0) * torn

    favour_db = LATE_DB + (EARLY_DB - LATE_DB) * np.sqrt(early)
    liquid = cloud(*GURGLE, np.full(N, 1. * EARLY_HZ), favour_db) * gurgle_gain
    liquid += cloud(*GLUG, curve(1, FAVOUR), 2.6 + 14.4 * still) * glug_gain
    liquid += cloud(*SPLASH, curve(2, FAVOUR), 5.0 + 9.15 * still) * splash_gain
    liquid += cloud(*SPATTER, np.full(N, 4450.), 2.9 * still) * spatter_gain
    liquid += cloud(*FIZZ) * fizz_gain
    pan_db = FOAM_PAN_DB * (1 - flow - .2)  # the foam lies further left than the stream
    return liquid * undb(np.array([0.2 * pan_db, -.8 * pan_db]))


def rumble():
    """Low rumble of the pot and hand-held phone: follows the stream, swells with bumps, dips in the lulls."""
    bed = undb(RUMBLE_DB + RUMBLE_SLOPE * (curve(1) - STREAM_REF_DB))
    gain = np.hypot(bed, swells(BUMPS, BUMP_S))
    t = np.arange(N) / SR
    dips = np.prod([1 - 0.65 * np.exp(-((t - s) / half) ** 2) for s, half in LULLS], axis=0)
    return cloud(*RUMBLE) * gain * dips


def whine():
    """Faint steady tones of a kitchen appliance, drifting slightly in pitch, mostly on the left."""
    turns = np.cumsum(1 + .001 * np.log(wander(8.))) / SR
    tone = sum(undb(db) * np.sin(2 * np.pi * hz * turns) for hz, db in WHINES)
    return np.array([2 * tone, .3 * tone]) * undb(curve(1, WHINE_FADE))


def drops():
    """Smaller slugs at random moments, stronger with the spray; rows like the slaps."""
    when, place, width, length = rng.random((int(DROPS_PER_S * N / SR), 4)).T
    chance = rng.standard_normal((len(when), 3)).T
    spray_db = curve(2)[(when * N).astype(int)]
    db = DROP_DB + 2.13 * (spray_db - DROP_SPRAY_DB) + DROP_SPREAD_DB * np.minimum(chance[0], 1)
    hz = DROP_LO_HZ * (DROP_HI_HZ / DROP_LO_HZ) ** place
    body_db, pan_db = -18 + 3.7 * chance[1], 8.4 + 2.7 * chance[2]
    return np.transpose([when * N / SR, db, hz, body_db, pan_db, 0.083 + 0.16 * width, 0.32 + 0.99 * length])


def slaps():
    """Slugs and drops of liquid hit bag and pool: longer bursts also ring longer."""
    slugs = np.vstack([SLAPS, drops()])
    width, spread_s = np.abs(slugs[:, 5]), np.abs(slugs[:, 6]) / 1000
    cycles = 3 + RING_LENGTHS * spread_s * slugs[:, 2]
    return hits(slugs, slugs[:, 4], width, width + .3, spread_s, cycles, crack_db=-19.5, spray_db=-23.0,
                body_hz=1836.0, body_db=-5.0, thud_hz=75., thud_db=-60.0)


def pops():
    """Large bubbles: one ringing, slightly rising grain for each row."""
    s, db, hz, pan_db = np.transpose(POPS)
    chance = rng.standard_normal((len(s), 2)).T
    return highpass(grains(s, hz, POP_CYCLES, POP_GLIDE, undb(db + POP_DB), pan_db, chance), 4, 400.)


def smacks():
    """The heaviest slugs smack the pool in a short broad burst and thump the pot."""
    s, smack_db, thump_db = np.transpose(SMACKS)
    smack = swarm(s, smack_db + SMACK_DB, SMACK_HZ, 5.0, SMACK_OCTAVES, SMACK_S, SMACK_CYCLES, count=60)
    thump = swarm(s, thump_db + THUMP_DB, THUMP_HZ, 1.5, 0.5, 0.0016, 2.9, count=6)
    return highpass(smack, 2, 250.) + thump


def ticks():
    """The settling bag ticks: very tight, narrow bursts that ring for many cycles."""
    return hits(TICKS, np.transpose(TICKS)[4], 0.057, 0.091, 0.0001, 36.0, crack_db=-30.5, spray_db=-46.0,
                body_hz=1017.0, body_db=-10.0, thud_hz=326.0, thud_db=-17.0)


def notch_out(x):
    """Notches deepen as the bubbling level falls, leaving the sound thinner."""
    depth = np.clip(1.45 * stillness() - .3, 0, 1)
    notched = x
    for hz, width_hz in NOTCHES:
        notched = signal.lfilter(*signal.iirnotch(hz, hz / width_hz, fs=SR), notched)
    return x + depth * (notched - x)


def tail_hiss():
    """Soft narrow hiss: a cloud of long grains in short swells in the fading tail."""
    return cloud(*TAIL_HISS) * swells(HISS_SWELLS, HISS_SWELL_S)


def snaps():
    """Dry bright snaps on the left, each a burst of grains."""
    return hits(SNAPS, SNAP_PAN_DB, 0.39, 0.24, 0.00096, 28.0, crack_db=-16.0, spray_db=-38.0,
                body_hz=2300.0, body_db=-2.0, thud_hz=330., thud_db=-42.0)


def knocks():
    """A few close tones struck together, so that each knock beats as it fades."""
    s, db, hz, cycles = np.transpose(KNOCKS)
    return swarm(s, db + KNOCK_DB, hz, KNOCK_PAN_DB, 0.073, .0015, cycles, count=8)


def scene():
    """Mixes the pour, rumble and whine with the hits, ticks, tail hiss, snaps and knocks."""
    beds = notch_out(pour() + ticks()) + rumble() + whine()
    liquid_hits = slaps() + pops() + smacks()
    return beds + liquid_hits + tail_hiss() + snaps() + knocks()


def record(dry):
    """The phone loses the deepest bass, clips near full scale and cuts the top."""
    thin = highpass(dry, 2, 33.)
    top_cut = signal.ellip(12, .2, 90, TOP_HZ, fs=SR, output="sos")
    return signal.sosfilt(top_cut, np.clip(thin, -CLIP, CLIP))


dry = scene()
out = record(dry)
waveform_to_disk(out)
```